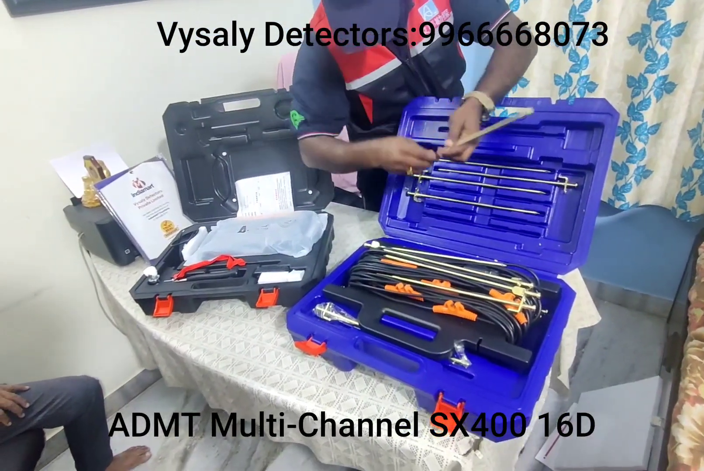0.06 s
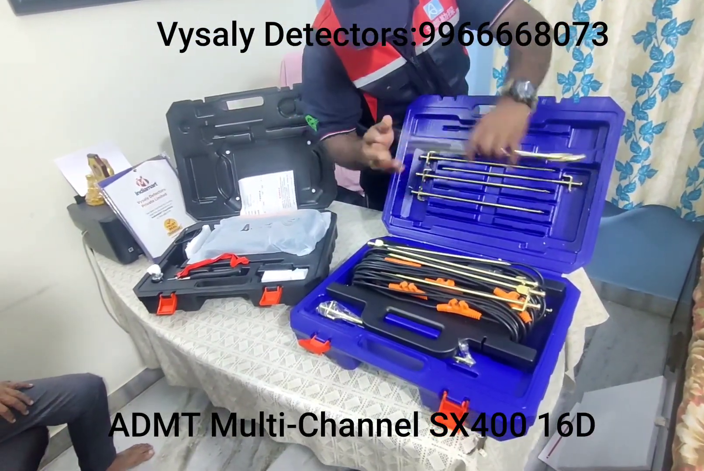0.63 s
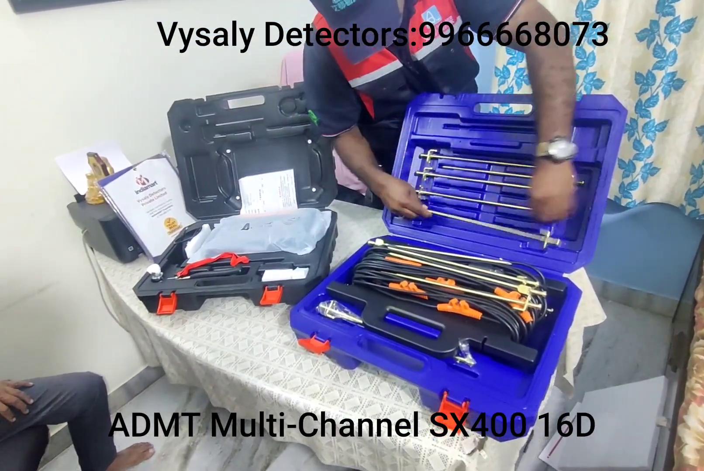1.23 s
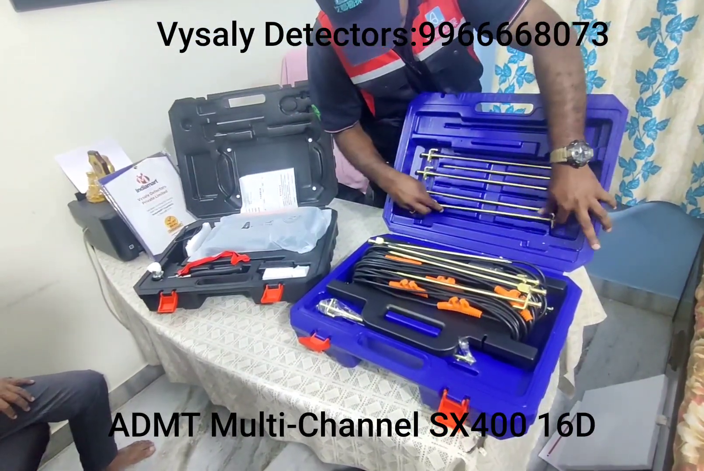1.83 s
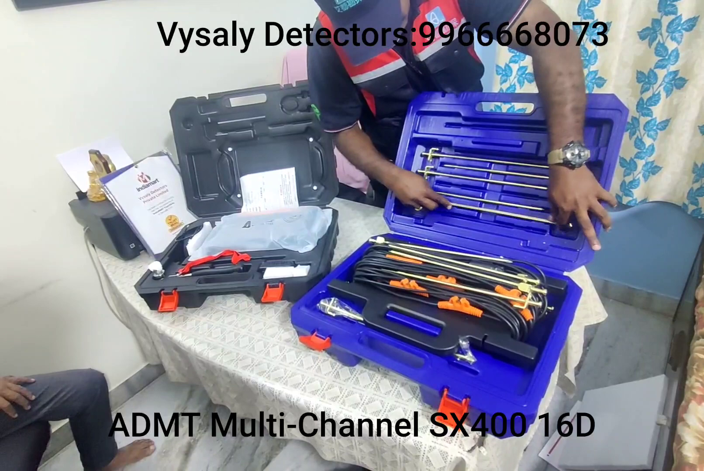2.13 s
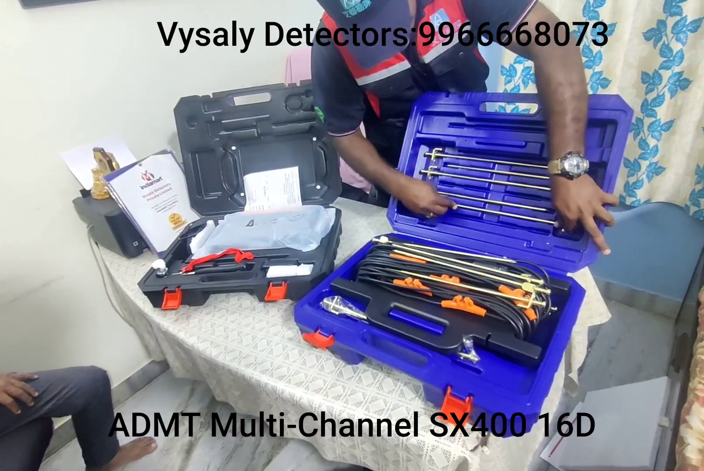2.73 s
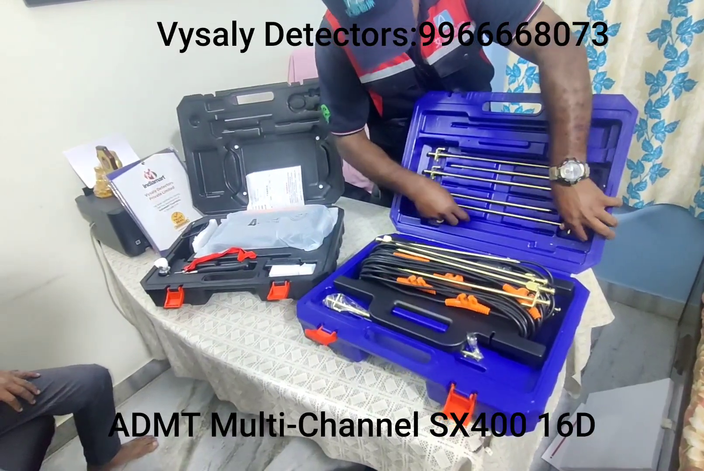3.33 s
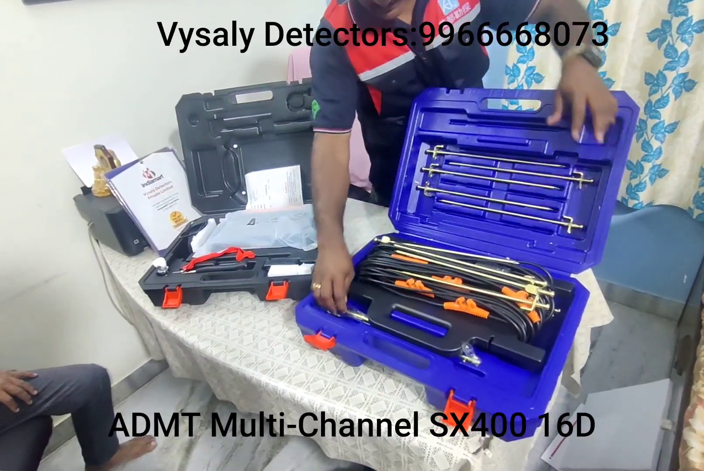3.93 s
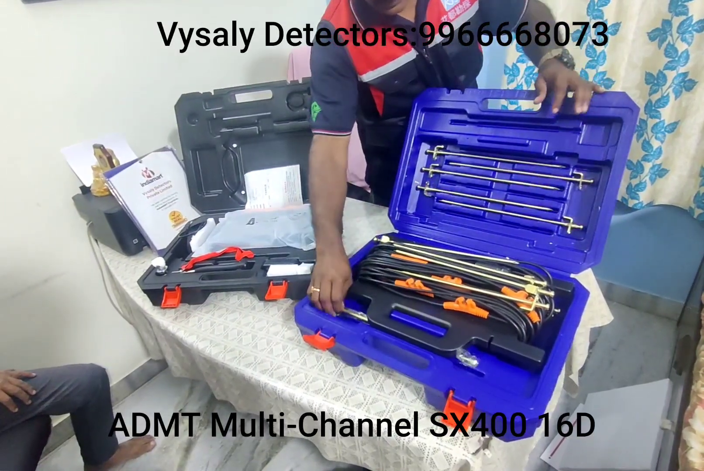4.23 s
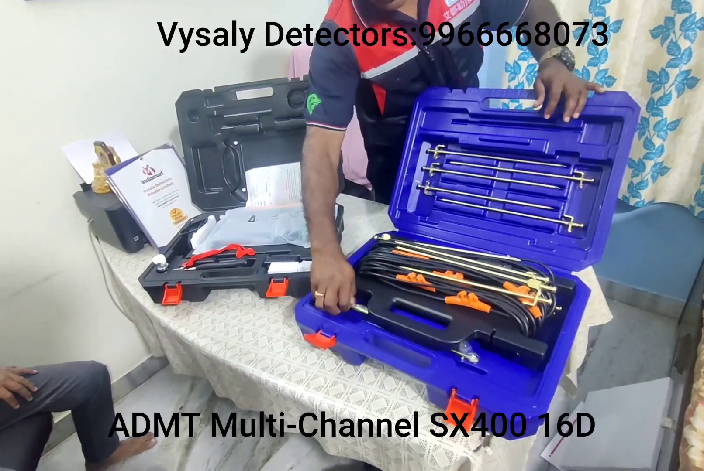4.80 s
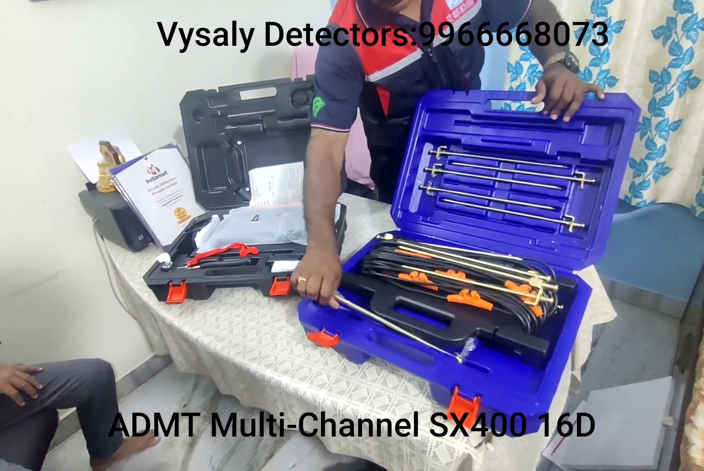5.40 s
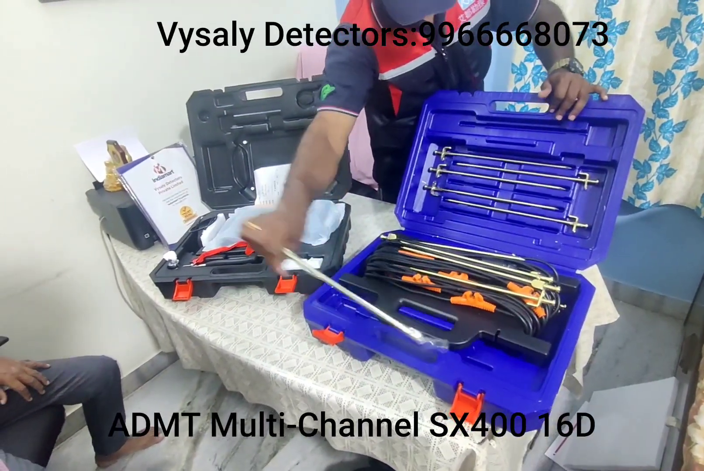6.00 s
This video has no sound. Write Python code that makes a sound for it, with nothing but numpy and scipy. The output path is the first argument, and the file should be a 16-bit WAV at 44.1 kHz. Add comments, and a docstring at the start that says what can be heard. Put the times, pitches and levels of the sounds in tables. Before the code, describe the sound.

In a small room, metal rods knock into a plastic case, followed by crackly rustling and sharp clanks as a tube is pulled loose.

```python
"""A small hard-walled room, with a two-port stereo microphone near a moulded plastic tool case.
Steel rods are pressed into the clips of the lid: plastic snaps, the hollow shell knocks and clatters,
steel clinks, and the rods rub and sing faintly as they slide. Then a metal tube is tugged out of the
tray below, sticking and slipping with a crackling rustle and knocking as it comes.
The walls answer each contact; under it all lie the room's hush and a draught rumbling on the ports."""
import sys
import numpy as np
from scipy import signal
from scipy.fft import rfft, irfft
from scipy.io import wavfile
from scipy.ndimage import uniform_filter1d, minimum_filter1d

SR = 44100
rng = np.random.default_rng(int(sys.argv[2]) if len(sys.argv) > 2 else 0)


def store_wav(level_fs):
    """Save 16-bit WAV to argv[1]."""
    pcm = np.round(np.clip(np.atleast_2d(level_fs), -1, 1) * 32767)
    wavfile.write(sys.argv[1], SR, pcm.T.astype(np.int16))


N = 271215
TIME = np.arange(N) / SR


def amp(db):
    return 10 ** (np.asarray(db) / 20)


def unit(x):
    """Scale to rms 1."""
    return x / np.sqrt(np.mean(x ** 2) + 1e-20)


def fade(t, t60):
    """Free decay, 60 dB in t60 seconds."""
    return np.exp(-np.log(1000) * t / t60)


def at(hz, rows):
    """Read a (freq_hz, value) table on a log frequency axis."""
    freq_hz, value = np.transpose(rows)
    return np.interp(np.log(hz + 0.0011), np.log(freq_hz), value)


def colour(x, rows, size=4096):
    """Minimum-phase filter with the given (freq_hz, level_db) response."""
    cepstrum = irfft(np.log(amp(at(np.fft.rfftfreq(size, 1 / SR), rows))))
    cepstrum[1:size // 2] *= 2
    cepstrum[size // 2 + 1:] = 0
    impulse = irfft(np.exp(rfft(cepstrum)))[:size // 2]
    return signal.fftconvolve(x, impulse)[:len(x)]


def band(x, hz, kind, order=3):
    """Butterworth filter."""
    return signal.sosfilt(signal.butter(order, hz, kind, fs=SR, output="sos"), x + 1e-18)


def add(track, start_s, x):
    """Lay a sound into a track."""
    i = max(int(start_s * SR), 0)
    track[..., i:i + x.shape[-1]] += x[..., :N - i]


def grains(n, per_s, spread_db):
    """Random tiny contacts, most weak and a few strong."""
    touches = rng.random(n) < per_s / SR
    strength = np.minimum(rng.exponential(size=n), 4)
    return touches * rng.choice([-1, 1], n) * amp(spread_db * strength)


def wander(hz, kind="lowpass"):
    """Slow random motion at rms 1."""
    return unit(band(rng.standard_normal(N), hz, kind, order=2))


# How alike the two ports hear diffuse sound: freq_hz, correlation
PORT_LIKENESS = [(130, 1), (300, 0.97), (650, 0.75), (1400, 0), (2800, 0.16)]


def diffuse(n):
    """Noise from all sides: alike at both ports in the bass, nearly unrelated in the treble."""
    alike = np.clip(at(np.fft.rfftfreq(n, 1 / SR), PORT_LIKENESS), -1, 1)
    mid, side = rfft(rng.standard_normal((2, n)))
    mid, side = mid * np.sqrt((1 + alike) / 2), side * np.sqrt((1 - alike) / 2)
    return irfft(np.array([mid + side, mid - side]), n)


# Room tone at the microphone: freq_hz, level_db
ROOM_TONE_COLOUR = [(88, -22.5), (150, -4), (175, -7), (268, -7.5), (445, -12.5), (656, -11), (708, -7),
                    (781, -11.5), (2020, -20.5), (2860, -28), (7270, -35), (15500, -74)]


def room_tone(level_db=-54.5):
    """The steady hush of the room, all around the microphone."""
    return amp(level_db) * unit(np.array([colour(port, ROOM_TONE_COLOUR) for port in diffuse(N)]))


# Rise and fall of the draught at the microphone: time_s, level_db
DRAUGHT_SWELL = [(0, -37), (.55, -40.5), (.68, -33.5), (.85, -33.5), (1.05, -30), (1.55, -34), (2.0, -33),
                 (2.9, -36), (3.8, -34.5), (4.15, -40), (4.95, -33.5), (6.15, -39)]
# Its rumble, right on the ports: freq_hz, level_db
DRAUGHT_COLOUR = [(8.8, -24), (15, 6.5), (39, -1.5), (70, -11.5), (117, -19), (150, -28.5), (177, -32.5),
                  (260, -52.5), (340, -62.5), (570, -120)]


def draught(left_db=7.5, right_db=1.5, gust_db=3):
    """Moving air buffets each port on its own, the left one more."""
    ports = []
    for port_db in (left_db, right_db):
        gusts = amp(gust_db * wander(hz=9.2))
        rumble = band(colour(rng.standard_normal(N), DRAUGHT_COLOUR), 252, "lowpass")
        ports.append(amp(port_db) * unit(rumble * gusts))
    return np.array(ports) * amp(np.interp(TIME, *np.transpose(DRAUGHT_SWELL)))


# Decay between the hard walls: freq_hz, t60_s
ROOM_DECAY = [(150, 0.45), (700, 0.35), (2500, 0.34), (5500, 0.32), (12000, 0.36)]


def room(direct_db, wet_db, early_db, early_t60=0.019, wall_s=0.012, before_wall_db=-3):
    """From one spot to the microphone: direct sound, reflections off case and table, then the walls."""
    t = np.arange(SR * 2 // 5) / SR
    noise, edges_hz = diffuse(len(t)), [40, 350, 1400, 3800, 8000, 17000]
    hz, spectrum = np.fft.rfftfreq(len(t), 1 / SR), rfft(noise)
    tail = np.zeros_like(noise)
    for low, high in zip(edges_hz, edges_hz[1:]):
        t60 = at(np.sqrt(low * high), ROOM_DECAY)
        tail += irfft(spectrum * (hz >= low) * (hz < high), len(t)) * fade(t, t60)
    # the tail builds up, and is quieter until the nearest wall answers
    tail *= (1 - np.exp(-t / 0.0036)) * amp(before_wall_db * (t < wall_s))
    early = noise[:, ::-1] * fade(t, early_t60) * (t > .001)
    response = (amp(wet_db) * unit(tail) + amp(early_db) * unit(early)) / np.sqrt(len(t))
    response[[0, 1], [0, 3]] += amp(direct_db)  # reaches the left port 3 samples ahead
    return response


def hear(x, response):
    """Send a sound through a room response to both ports."""
    return signal.fftconvolve(x[None], response, axes=1)[:, :len(x)]


# Plastic snapping under the fingers, around the case: start_s, level_db, pitch_hz
SNAPS = [(0.368, -45, 5500), (0.8426, -43.5, 4460), (2.5686, -37, 5060), (2.8932, -37.5, 6300),
         (3.9821, -31, 4000), (3.994, -28.5, 4240), (3.9996, -28.5, 4400), (4.0496, -36, 3400),
         (4.1001, -35, 4100), (4.1093, -28.5, 4800), (4.1566, -21.5, 5300), (4.1693, -29, 5500),
         (4.178, -30, 5000), (4.2008, -24, 5300), (4.2152, -38, 5300), (4.2441, -23, 4000),
         (4.2831, -36, 4200), (4.298, -27, 4400), (4.3212, -30.5, 4000), (4.3627, -30, 3300),
         (4.4114, -20.5, 4400), (4.4632, -26, 4700), (4.5026, -23, 4900), (4.5165, -21.5, 5100),
         (4.5302, -25.5, 4500), (4.5787, -26, 5400), (4.5935, -33, 5600), (4.6222, -24, 5400),
         (4.6541, -18.5, 4500), (4.668, -29, 5000), (4.68, -27, 5400), (4.7389, -24, 5100),
         (4.7961, -25.5, 2950), (4.8819, -29.5, 5700), (4.9222, -31, 4200), (4.9521, -35.5, 5100),
         (4.9911, -29.5, 5100), (5.0649, -34, 4700), (5.1567, -28.5, 4000), (5.5459, -27.5, 5400),
         (5.6054, -34, 4200), (5.6202, -37, 5500), (5.6287, -24, 4000), (5.6345, -28, 3800),
         (5.679, -30, 6900), (5.7011, -26, 6700), (5.7126, -30, 4300), (5.7303, -24.5, 6600),
         (5.8168, -25.5, 6300), (5.8848, -27, 6600), (5.9478, -28.5, 5200), (6.0153, -18, 5800),
         (6.026, -18, 5200), (6.1439, -28, 5500)]
# Crackle of the plastic, in snaps, rubs and tugs alike: freq_hz, level_db
CRACKLE_COLOUR = [(700, -10), (1500, -6), (2500, -3), (3500, -4.5), (4500, -3), (5700, 2.5), (6700, -6.5),
                  (8000, -12), (9000, -29.5), (12000, -27.5), (15800, -38)]


def snaps(gain_db=-7, crack_t60=0.0082, body_t60=0.0028, full_ring_db=-30, ring_growth=0.44):
    """A plastic edge lets go: a crack that fills the room, and a few close cycles at the edge's pitch."""
    track, t = np.zeros((2, N)), np.arange(SR // 20) / SR
    attack = slice(SR // 200)
    spots = [room(direct_db=-12, wet_db=-5.5, early_db=-7.5) for _ in range(6)]
    close = room(direct_db=-4.5, wet_db=-10.5, early_db=-11.5)
    for k, (start_s, level_db, hz) in enumerate(SNAPS):
        burst = rng.standard_normal(len(t)) * fade(t, crack_t60)
        crack = band(colour(burst, CRACKLE_COLOUR), 1300, "highpass", order=2)
        cycles = np.sin(2 * np.pi * hz * t) * fade(t, body_t60)
        body = band(cycles, [hz / np.sqrt(2), hz * np.sqrt(2)], "bandpass", order=2)
        # light snaps only tick, stronger ones also ring
        ring = amp(ring_growth * min(level_db - full_ring_db, 0))
        size = amp(level_db + gain_db) / np.hypot(1, ring)
        for x, gain, spot in ((crack, size, spots[k % len(spots)]), (body, size * ring, close)):
            add(track, start_s, signal.fftconvolve(gain * x[None] / np.std(x[attack]), spot, axes=1))
    return track


def panel_modes(t, modes, contact_s=0.00021):
    """Free vibration of each panel mode, as a decaying phasor that builds up over the contact time."""
    hz, level_db, t60 = np.transpose(modes)[:, :, None]
    onset = 1 - np.exp(-(t / contact_s) ** 2)
    return amp(level_db) * fade(t, t60) * np.exp(2j * np.pi * hz * t) * onset


def strike_weights(modes, scatter_db, whole_panel_hz=225):
    """Each blow lands elsewhere and weights the modes anew; higher modes meet the ports out of step."""
    hz = np.transpose(modes)[0]
    weight, side, skew = rng.standard_normal((3, len(modes)))
    port_phase = np.outer([1, -1], skew * (hz / 1100) ** 1.5)
    # the broadest modes are pushed the same way wherever the blow lands
    push = np.where(hz > whole_panel_hz, np.sign(side) * amp(scatter_db * weight), 1)
    return push * np.exp(1j * port_phase)


# Borders between the thud, knock, clack and tick of a blow: freq_hz
CROSSOVERS = [450, 1150, 2800]


def registers(blow):
    """Split a blow four ways, from panel thud to contact tick."""
    low, middle, high = CROSSOVERS
    return [band(blow, low, "lowpass", order=5), band(blow, [low, middle], "bandpass"),
            band(blow, [middle, high], "bandpass"), band(blow, high, "highpass", order=5)]


def shell_knocks(hits, modes, clatter_colour, *, gain_db, ring_db, scatter_db, pocket_db, clatter_t60,
                 crack_db, clack_db, tick_db, wet_db, early_db, pocket_ratio=1.09, top_t60=0.32):
    """Steel meets a hollow plastic shell: a crack, a burst of clatter, and the ringing panels."""
    track, t = np.zeros((2, N)), np.arange(SR * 2 // 5) / SR
    attack = slice(SR // 40)
    ringing = panel_modes(t, modes)
    spots = [room(direct_db=-4.5, wet_db=wet_db, early_db=early_db) for _ in range(5)]
    for k, (start_s, level_db, thud_db, hardness, pocket_hz) in enumerate(hits):
        clatter = unit(grains(len(t), per_s=5000, spread_db=3.6)) * fade(t, clatter_t60)
        clatter[0] += amp(crack_db) * np.sqrt(np.sum(clatter ** 2))
        clatter = hear(colour(clatter, clatter_colour), spots[k % len(spots)])
        ring = (strike_weights(modes, scatter_db) @ ringing).imag
        blow = clatter / np.std(clatter[:, attack]) + amp(ring_db) * ring / np.std(ring[:, attack])
        # the moulded pocket under the steel gives each knock its note
        pocket = band(blow, [pocket_hz / pocket_ratio, pocket_hz * pocket_ratio], "bandpass", order=1)
        blow += amp(pocket_db) * pocket
        # only the first touch is bright: the plastic soon swallows the top
        dull = band(blow, 7800, "lowpass", order=4)
        blow = dull + (blow - dull) * fade(t, top_t60)
        # a harder contact tilts everything above the knock upward
        tilt_db = hardness * np.array([0, 0, 1.3, 2.7])  # octaves above the knock
        levels_db = level_db + gain_db + np.array([thud_db, 0, clack_db, tick_db]) + tilt_db
        for part, part_db in zip(registers(blow), levels_db):
            add(track, start_s, amp(part_db) * part / np.std(part[:, attack]))
    return track


# Rods knocking in the lid: start_s, level_db, extra_thud_db, hardness_db_per_octave, pocket_hz
LID_HITS = [(1.005, -36.5, 11, 5, 905), (1.033, -37, 7, -10, 262), (1.184, -22, 2, -1.5, 676),
            (1.196, -34, 1.5, -3, 635), (1.306, -21, -0.5, 0.3, 744), (1.323, -30.5, -5, 2, 433),
            (1.344, -28, 3, 1, 985), (1.361, -30, 1, 1, 415), (1.382, -35, 4, -1, 407),
            (1.448, -28.5, -25, -2.5, 736), (1.493, -30, 0.5, -2.5, 590), (1.509, -33.5, -5.5, -5, 756),
            (1.664, -45.5, 2.5, -4, 840), (1.897, -48, -3.5, -2.5, 630), (1.942, -41.5, -3, -1.5, 920),
            (2.139, -48, 1, -1, 724), (2.2302, -27.5, 5, 1.5, 555), (2.2401, -27.5, 2.5, -6, 215),
            (3.023, -52.5, 7.5, 1, 417), (3.167, -61, 23, 2.5, 290), (3.481, -36.5, 0.5, -4.5, 323),
            (3.503, -43.5, -26, 1, 1600), (3.527, -66, 2, -8, 665)]
# Ringing of the lid's panels: pitch_hz, level_db, t60_s
LID_MODES = [(106, 1.5, 0.29), (203.4, 6, 0.25), (246.8, -0.5, 0.36), (273.4, -3.5, 0.35),
             (311.3, -2, 0.31), (361, -1.5, 0.19), (399.4, -1.5, 0.35), (593, -11, 0.08), (642.3, -1, 0.19),
             (757, -3, 0.13), (772, -3.5, 0.22), (948.5, 6.5, 0.094), (1130, -16, 0.54),
             (1600, -16.5, 0.18), (2210, -23, 0.16), (2480, -35, 0.34)]
# Dense clatter of the lid: freq_hz, level_db
LID_COLOUR = [(60, -43), (130, -2.5), (220, 0), (400, -4.5), (900, -5), (1500, -13.5), (2500, -20),
              (4000, -20), (5800, -11), (7200, -25.5), (9500, -43.5), (15000, -53.5)]


def lid_knocks():
    """Rods strike the lid, with plenty of room sound; the nearer a panel's middle, the more thud."""
    return shell_knocks(LID_HITS, LID_MODES, LID_COLOUR, gain_db=-0.5,
                        ring_db=-1, scatter_db=0, pocket_db=0, clatter_t60=0.079,
                        crack_db=2.5, clack_db=-7.5, tick_db=-15.5, wet_db=3.5, early_db=-0.5)


# Steel biting on steel in the case at the hardest blows: start_s, lower_hz, upper_hz, level_db
CLINKS = [(1.1852, 3340, 5900, -22.5), (1.3065, 3390, 3890, -14), (1.3232, 1920, 3650, -17),
          (1.3457, 3800, 5800, -24), (2.2304, 3950, 5960, -18), (2.2424, 4950, 5700, -13),
          (5.3026, 3380, 4940, -7.5), (5.3045, 1390, 2010, -11), (5.3956, 1090, 1490, -9),
          (5.4045, 1040, 1850, -22)]


def clinks(ring_t60=0.0077, upper_db=-2, crack_db=-11, crack_t60=0.015):
    """A hard metal contact cracks and rings at two pitches for a few cycles before plastic damps it."""
    track, t = np.zeros(N), np.arange(SR // 20) / SR
    for start_s, lower_hz, upper_hz, level_db in CLINKS:
        ring = np.sin(2 * np.pi * lower_hz * t) + amp(upper_db) * np.sin(2 * np.pi * upper_hz * t)
        crack = unit(band(rng.standard_normal(len(t)), [lower_hz / 2, upper_hz * np.sqrt(2)], "bandpass"))
        clink = ring * fade(t, ring_t60) + amp(crack_db) * crack * fade(t, crack_t60)
        add(track, start_s, amp(level_db) * band(clink, 6700, "lowpass", order=8))
    return track


def stroke(start_s, length_s, attack_s=0.0054, release_t60=0.16):
    """Envelope of one movement of the hand: it grips, holds to the end of its length and lets go."""
    rise = np.clip((TIME - start_s) / attack_s, 0, 1)
    released_s = np.clip(TIME - start_s - length_s, 0, 2 * release_t60)
    return rise * fade(released_s, release_t60)


# Rods singing in the lid, faint at the microphone: start_s, length_s, pitch_hz, level_db
SINGING_RODS = [(1.56, 0.23, 3710, -70.5), (3.41, 0.18, 2927, -64)]


def singing_rods(waver_hz=24, flutter_db=4.5):
    track = np.zeros(N)
    for start_s, length_s, pitch_hz, level_db in SINGING_RODS:
        wavering_hz = pitch_hz + waver_hz * wander(hz=70)
        flutter = amp(flutter_db * wander([12, 60], "bandpass"))
        mode = np.sin(2 * np.pi * np.cumsum(wavering_hz) / SR) * flutter
        track += amp(level_db) * stroke(start_s, length_s, attack_s=0.042, release_t60=0.92) * unit(mode)
    return track


# A rod rubbing softly along the lid's clips: start_s, length_s, level_db
RUBS = [(2.55, 0.28, -67), (2.82, 0.069, -62), (3.02, 0.075, -64.5), (3.28, 0.12, -62)]


def rod_rub(gain_db=-4):
    """Steel slides lightly over plastic in a stream of tiny contacts."""
    envelope = sum(amp(level_db) * stroke(start_s, length_s) for start_s, length_s, level_db in RUBS)
    friction = colour(grains(N, per_s=1800, spread_db=2.3), CRACKLE_COLOUR)
    return amp(gain_db) * envelope * unit(friction)


# Tugs on the tube, down in the tray: start_s, length_s, crackle_db, scrape_db
TUGS = [(3.975, 0.021, -52, -46.5), (4.105, 0.035, -42, -50), (4.27, 0.16, -52, -53),
        (4.41, 0.032, -51, -48), (4.5, 0.14, -48, -40.5), (4.648, 0.017, -33.5, -32.5),
        (4.725, 0.049, -43.5, -36.5), (4.88, 0.07, -46, -46.5), (5.058, 0.014, -47.5, -52),
        (5.155, 0.046, -44, -45), (5.54, 0.17, -60, -43.5), (5.625, 0.12, -46.5, -48.5),
        (5.785, 0.015, -41, -45.5), (5.945, 0.091, -44.5, -59), (5.998, 0.048, -37.5, -42.5),
        (6.125, .03, -53, -55)]


def tube_tugs():
    """The hand works the tube out: envelopes of speed, for the crackle, and pressure, for the scrape."""
    return sum(np.outer(amp(levels_db), stroke(start_s, length_s))
               for start_s, length_s, *levels_db in TUGS)


# The tray shaken by the scraping tube: freq_hz, level_db
SCRAPE_COLOUR = [(76, -60), (130, -4), (189, 6.5), (217, 2.5), (286, -5.5), (536, -2.5), (1110, -7.5),
                 (1740, -14), (2600, -13), (3380, -30), (5720, -120)]


def tube_drag(speed, pressure, crackle_db=-5, scrape_db=-4, sizzle_db=10, catch_db=0.5):
    """The tube sticks and slips in its slot: fine crackle on top, coarser slips that shake the tray."""
    catching = amp(catch_db * wander(hz=110))
    crackle = unit(colour(grains(N, per_s=450, spread_db=2) * catching, CRACKLE_COLOUR))
    scrape = unit(colour(grains(N, per_s=700, spread_db=3.3) * catching, SCRAPE_COLOUR))
    # the top of the crackle grows with the square of the sliding speed
    sizzle = unit(band(grains(N, per_s=260, spread_db=2.8) * catching, 7000, "highpass")) * speed ** 2
    return amp(crackle_db) * speed * crackle + amp(sizzle_db) * sizzle + amp(scrape_db) * pressure * scrape


def tube_slips(speed, gain_db=-6, pitches_hz=(3200, 4100, 5200, 6400)):
    """Single sharp slips stand out of the drag, each a few cycles long at one of several pitches."""
    slips = sum(band(grains(N, per_s=26, spread_db=5.5), [.8 * hz, 1.2 * hz], "bandpass", order=2)
                for hz in pitches_hz)
    return amp(gain_db) * unit(slips) * speed


# The tube knocking in the tray: start_s, level_db, extra_thud_db, hardness_db_per_octave, pocket_hz
TRAY_HITS = [(4.139, -47.5, -19, -1, 1120), (4.299, -48.5, -16, 0, 700), (4.391, -41.5, 9.5, -10, 725),
             (4.419, -47.5, 3.5, 2.5, 710), (4.502, -43, 5, -6, 447), (4.5495, -35.5, -12, -4, 720),
             (4.623, -38.5, 7, -1, 750), (4.655, -37.5, 5.5, 1, 457), (4.705, -48, 0, -5, 463),
             (4.796, -40.5, -1.5, -1, 497), (4.909, -49.5, 6, 0, 460), (5.066, -52, 8.5, -4, 530),
             (5.204, -48, 13, -13, 830), (5.2955, -26.5, 4, -2, 970), (5.303, -16.5, 1, 0, 953),
             (5.3165, -19, -2.5, 0, 513), (5.394, -20.5, -7, -2.5, 1030), (5.404, -23, -0.5, -1.5, 1800),
             (5.443, -35.5, -1, 1, 980), (5.648, -37.5, 1, -1.5, 1000), (5.787, -57.5, 9, -3, 950),
             (6.127, -46, 1.5, -6, 740)]
# Ringing of the tray's panels: pitch_hz, level_db, t60_s
TRAY_MODES = [(115.6, -4.5, 0.48), (151.3, 4.5, 0.42), (284, -4, 0.42), (400, -17, 0.21), (491, -6.5, 0.26),
              (652, -3, 0.35), (720, 2.5, 0.35), (983, 4, 0.13), (1019, 6, 0.18), (1215, 0.5, 0.17),
              (1220, -12, 0.2), (1368, 5, 0.2), (1820, -14, 0.17), (2230, -16, 0.33)]
# Dense clatter of the tray: freq_hz, level_db
TRAY_COLOUR = [(60, -19), (150, -1), (225, 0), (300, 0.5), (560, -2.5), (1100, 6), (1700, -6), (3200, -29),
               (5600, -25), (7200, -33.5), (9500, -54), (15000, -70.5)]


def tray_knocks():
    """The tube strikes the hollow tray, drier at the microphone than the knocks in the lid."""
    return shell_knocks(TRAY_HITS, TRAY_MODES, TRAY_COLOUR, gain_db=-2,
                        ring_db=-3.5, scatter_db=3.5, pocket_db=6.5, clatter_t60=0.04,
                        crack_db=-1, clack_db=-2.5, tick_db=-6.5, wet_db=-1.5, early_db=-9)


def scene():
    """What reaches the microphone: knocks, snaps, clinks and sliding metal over room tone and draught."""
    knocks = lid_knocks() + tray_knocks()
    speed, pressure = tube_tugs()
    contacts = snaps() + hear(tube_slips(speed), room(direct_db=-4.5, wet_db=-10, early_db=-6.5))
    steel = hear(clinks(), room(direct_db=-5, wet_db=-6.5, early_db=-6))
    friction = tube_drag(speed, pressure) + rod_rub() + singing_rods()
    sliding = hear(friction, room(direct_db=-2.5, wet_db=1.5, early_db=-27))
    return knocks + contacts + steel + sliding + room_tone() + draught()


# The microphone's left port is duller in the presence range: freq_hz, left_minus_right_db
PORT_BALANCE = [(1200, 0), (2400, -5), (4600, -7), (7800, 1.5), (15000, -0.5)]


def record(dry, ceiling=0.88, top_hz=15500):
    """Each port has its own colour; a fast limiter holds the loudest peaks and the top is cut."""
    ports = np.array([colour(port, [(hz, side * db / 2) for hz, db in PORT_BALANCE])
                      for port, side in zip(dry, (1, -1))])
    gain = ceiling / np.maximum(np.abs(ports).max(axis=0), ceiling)
    gain = uniform_filter1d(minimum_filter1d(gain, size=129), size=129)
    top_cut = signal.ellip(8, .2, 70, top_hz, fs=SR, output="sos")
    return signal.sosfilt(top_cut, ports * gain)


dry = scene()
out = record(dry)
store_wav(out)
```